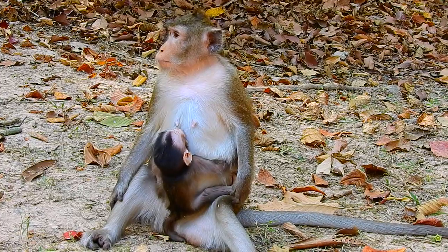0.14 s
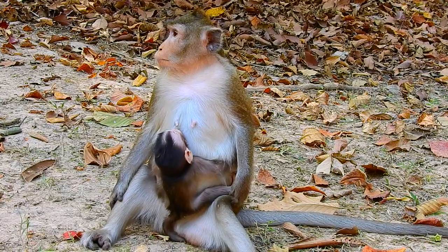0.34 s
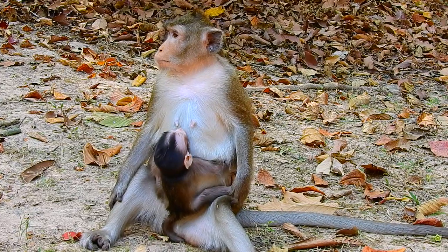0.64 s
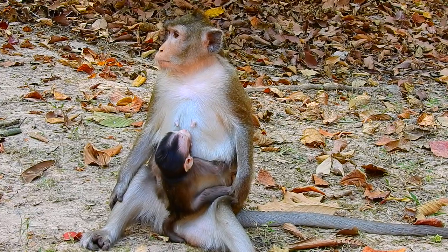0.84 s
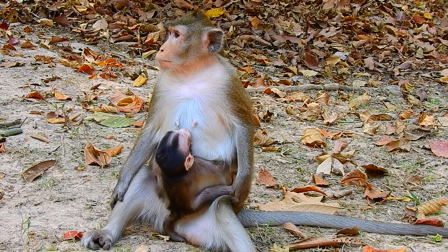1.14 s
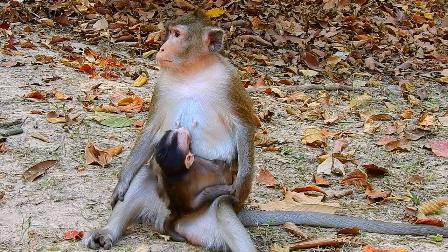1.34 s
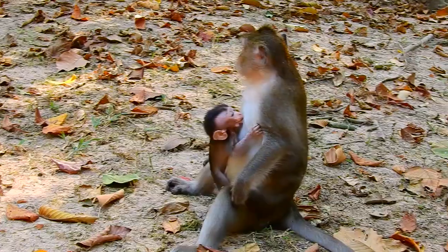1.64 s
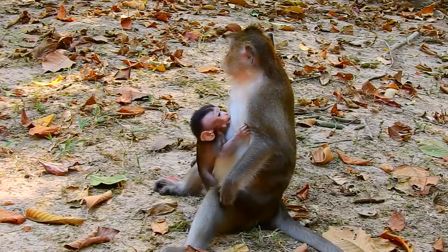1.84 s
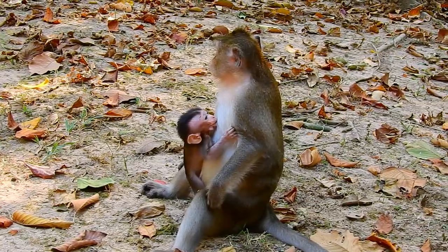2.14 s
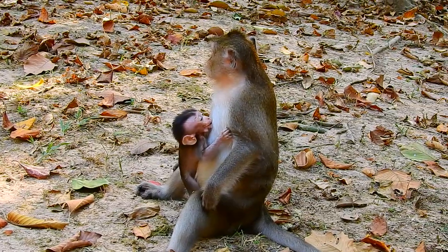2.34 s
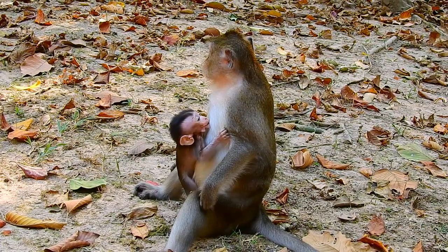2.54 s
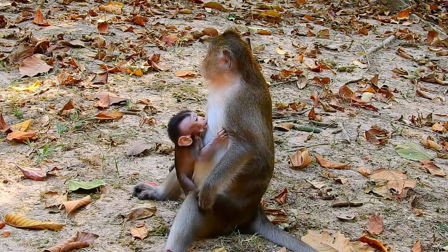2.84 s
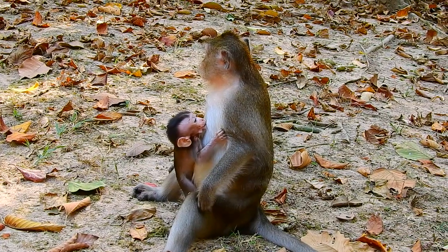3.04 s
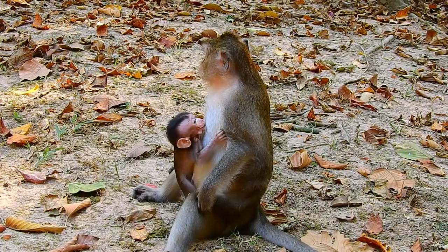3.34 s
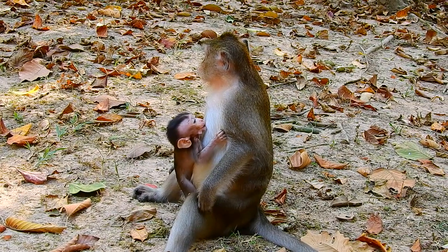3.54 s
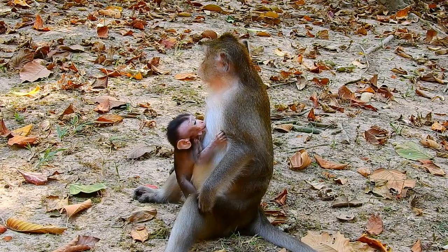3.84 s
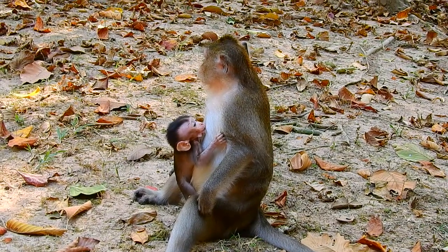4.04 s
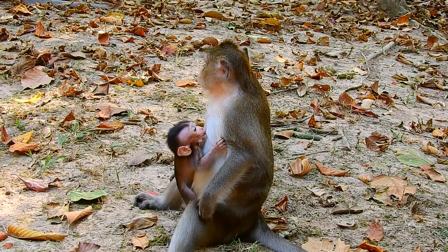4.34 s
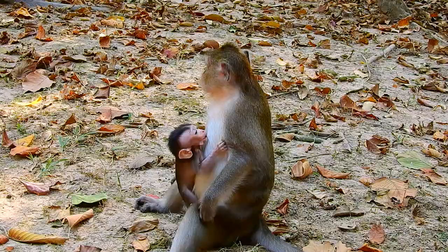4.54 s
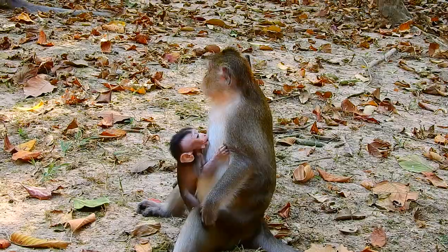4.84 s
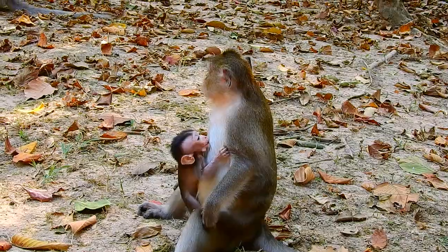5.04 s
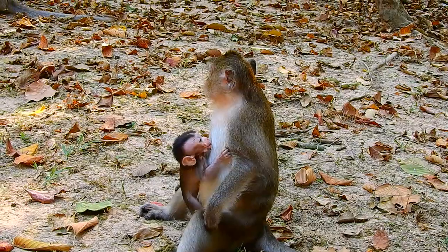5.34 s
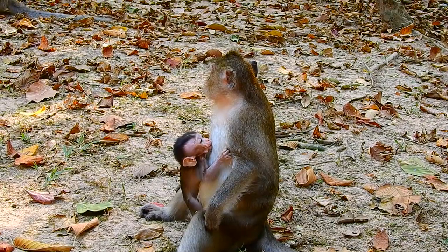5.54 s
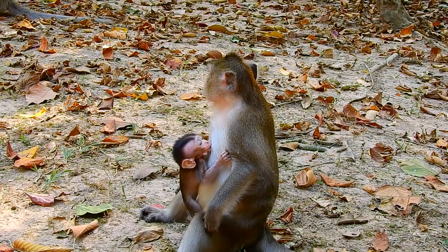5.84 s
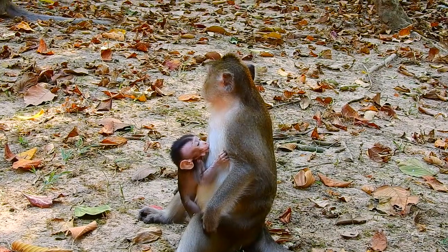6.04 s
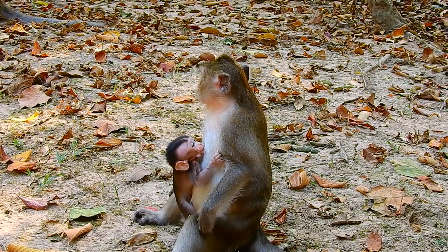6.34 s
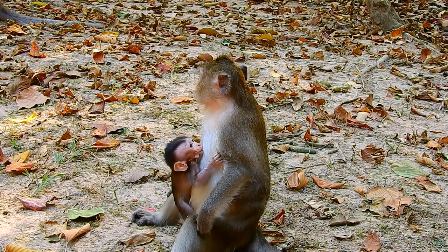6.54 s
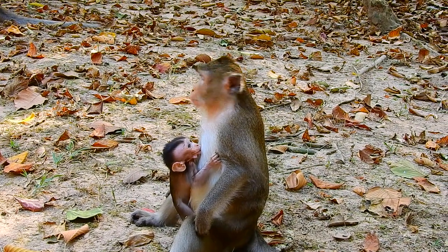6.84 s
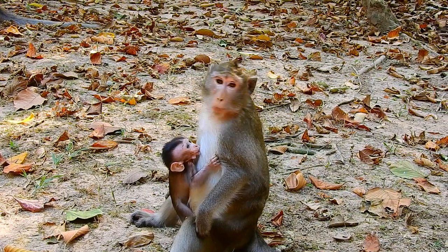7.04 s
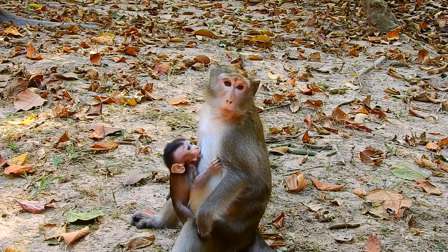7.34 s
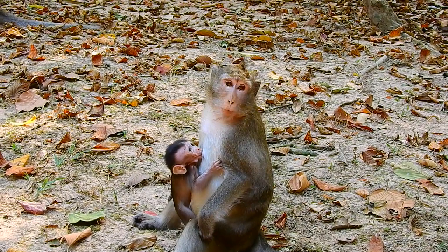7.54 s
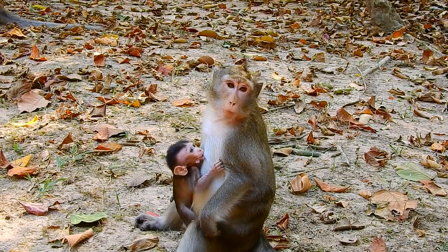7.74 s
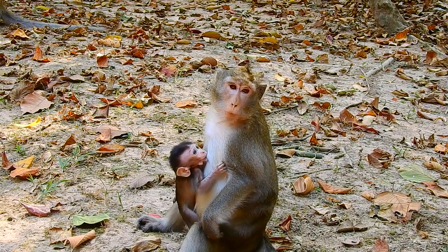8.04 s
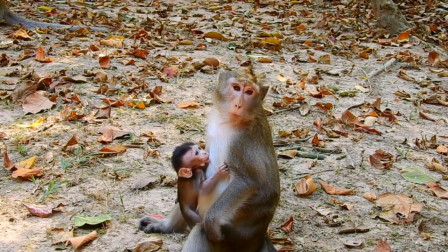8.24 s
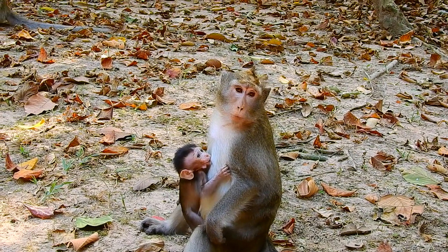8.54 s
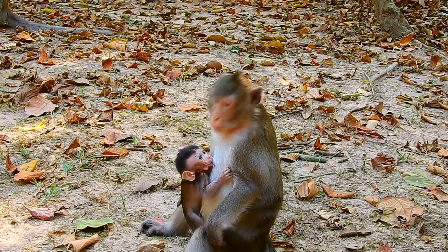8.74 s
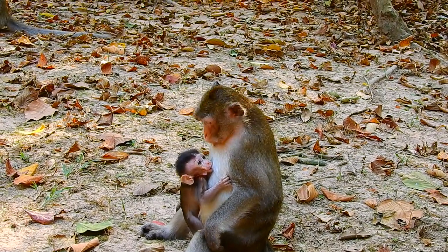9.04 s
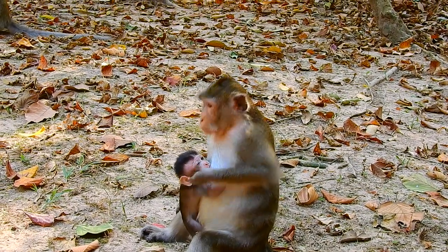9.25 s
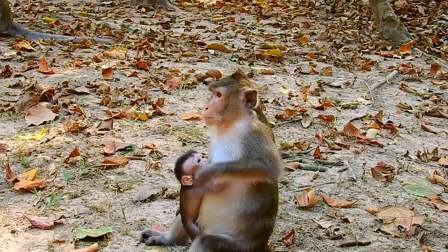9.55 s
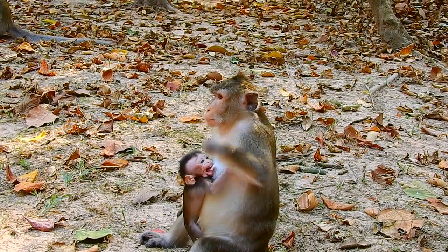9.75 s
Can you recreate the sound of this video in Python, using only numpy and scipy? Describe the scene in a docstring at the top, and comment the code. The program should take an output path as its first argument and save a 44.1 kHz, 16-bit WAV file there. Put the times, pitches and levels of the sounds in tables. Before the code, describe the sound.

In a forest, a young monkey gives two short, high wails that ring among the trees. The sound cuts out for half a second, then faint foliage hiss and far traffic return. A distant bird whistles once, dry leaves crackle lightly, and brief coos come in two groups. At the end, a loud, shrill squeal close to the microphone breaks briefly into a harsh screech.

```python
"""A leaf-strewn forest floor, where young macaques call: two wails ring among the trees, short coos
follow, and a close squeal breaks into a harsh screech. Each call is a vibration of the vocal folds,
filtered by the throat and scattered by trunks and leaves. Behind them are far traffic, the hiss of
foliage and insects, thin squeaks, a bird and rustles in the dry leaves. The sound cuts out for half
a second after the wails."""
import sys
import numpy as np
from scipy import signal
from scipy.fft import rfft, irfft, next_fast_len
from scipy.io import wavfile
from scipy.ndimage import uniform_filter1d, map_coordinates

SR = 44100
rng = np.random.default_rng(int(sys.argv[2]) if len(sys.argv) > 2 else 0)


N = 435688

# noise spectra of far traffic, and of foliage with insects: f/Hz, spectral level/dB
TRAFFIC_SPECTRUM = [(24, -35), (36, -16.5), (50, -3.5), (62, -7.5), (80, -3.5), (105, 1), (145, -0.5),
                    (200, -5.5), (260, -11), (410, -18.5), (600, -21), (850, -27), (1500, -32),
                    (3000, -67.5)]
FOLIAGE_SPECTRUM = [(590, -21.5), (1000, -10.5), (1190, -6), (1290, -2), (1490, -3.5), (1860, -3.5),
                    (2160, -4), (3830, -5.5), (4050, -5.5), (4980, -6), (5920, -3.5), (6410, -2),
                    (9360, -24), (11100, -26.5), (15500, -35.5)]
# coherence of the background between left and right: f/Hz, correlation
ALIKE = [(120, 1), (350, .98), (700, 0.88), (1400, 0.84), (6000, 0.35), (9000, 0.27), (13000, 0.3)]
# reverberation of the forest: f/Hz, reverberation time/s
FOREST = [(300, 0.56), (1500, 0.83), (2600, 1.22), (3100, 1.3), (3500, 0.96), (3850, 1.33), (4300, 1.2),
          (6400, 1.16), (8000, 0.87), (12000, 0.32)]
# wails: t/s, duration/s, top f/Hz, arch slope, final slump/share of pitch, level/dB,
# least roughness (0-1), mouth opening (0-1)
WAILS = [(0, .25, 850, .03, 0.019, -32.5, 0.35, 0.15), (.251, .262, 921, .16, .14, -23, .18, 0.91),
         (1.079, .23, 922, .17, .14, -24.5, .25, 1)]
# formants with the mouth narrow and wide: f/Hz, gain/dB
NARROW_MOUTH = [(500, -34.5), (830, -19), (1700, -14.5), (2520, -2.5), (3400, -3), (4200, -22.5), (5020, 1),
                (5850, -18), (6750, -8), (7600, -13), (8500, -23.5), (10000, -51)]
WIDE_MOUTH = [(500, -42), (870, -24), (1750, -14), (2650, -7), (3100, -10), (3450, 1), (3780, 5),
              (4150, -14), (5400, -9), (5800, -11), (6200, -2), (7300, -13), (7900, -12), (9000, -25),
              (13000, -46)]
# bumps, swishes and faint ringing: peak t/s, centre f/Hz, spread/octaves, rise time/s, level/dB
BUMPS = [(.866, 1250, .55, .0071, -33), (.881, 7200, .31, 0.014, -48), (1.028, 815, 0.4, 0.0039, -35.5),
         (2.08, 6400, 0.21, 0.066, -52), (3.294, 6200, .1, .026, -46), (3.668, 4300, .14, 0.12, -54),
         (4.144, 551, .05, 0.66, -51.5), (4.675, 1580, .8, .015, -45), (5.83, 6200, .2, .03, -49),
         (6.336, 353, 0.076, 0.032, -37), (6.4, 6500, 0.11, .35, -53.5), (7.03, 2200, .12, .11, -52),
         (7.16, 1800, .3, .07, -52), (7.848, 1150, .14, .0043, -35.5), (8.456, 252, 0.26, .026, -29),
         (8.497, 179, 0.44, .03, -25.5), (8.88, 4100, .12, 0.13, -52)]
# the loudest leaf crackles: t/s, relative level/dB, relative crunch/dB
CRACKLES = [(4.5314, -32.5, -14.5), (4.8194, -29.5, -10), (4.8998, -28.5, -10), (5.8062, -31.5, -7),
            (6.1674, -29.5, -18), (6.2994, -33.5, -7.5), (6.9097, -29.5, -3), (8.5989, -28.5, -19)]
# fainter crackles at random: start t/s, end t/s, relative level/dB, relative crunch/dB
LEAF_STIR = (3.5, 8.5, -38, -10)
# a crackle's crisp edge and the duller crunch beneath: f/Hz, level/dB
EDGE_SPECTRUM = [(1000, -14), (2500, -3), (4500, -2), (6500, 4), (8500, -16), (14000, -37)]
CRUNCH_SPECTRUM = [(400, -12), (1000, 2), (2500, -1), (4500, -12), (8000, -30)]
# squeaks: t/s, duration/s, top f/Hz, arch depth, place of the top (0-1), level/dB
SQUEAKS = [(2.56, .29, 11500, .11, .2, -71), (4.68, 0.11, 11400, .06, .45, -71),
           (6.96, .18, 13300, .27, .27, -70), (8.9, .35, 13200, .24, .45, -73)]
# the bird's whistle: t/s, duration/s, level/dB
BIRD_NOTE = (3.315, .25, -42.5)
# its reflections from far trees: delay/s, gain/dB
BIRD_ECHOES = [(.3, -14), (.52, -19)]
# coos: t/s, duration/s, top f/Hz, arch depth, place of the top (0-1), level/dB, overtone gain/dB
COOS = [(4.302, 0.056, 1212, 0.2, 0.4, -27, -6), (4.454, 0.067, 1365, .14, 0.34, -27, -1),
        (7.3, 0.065, 1290, 0.17, 0.33, -28.5, 1.5), (7.465, 0.059, 1200, 0.16, 0.33, -35, 4.5),
        (7.613, .058, 1282, 0.132, .34, -34, 3.5), (7.809, 0.056, 1528, .045, 0.6, -35.5, 14)]
# formants of the cooing throat: f/Hz, gain/dB
COO_THROAT = [(2000, -23), (2500, -15), (3300, -30), (4500, -17.5), (5300, -21), (6200, -14.5), (7600, -32),
              (9000, -41), (11000, -47), (14000, -58)]
# the squeal's three pushes, a list for each: t/s, f/Hz, level/dB
SQUEAL_PUSHES = [
    [(9.546, 7857, -30), (9.552, 7988, -20), (9.562, 7855, -20), (9.57, 8047, -11.5), (9.586, 8459, -13.5),
     (9.6, 9069, -21.5), (9.624, 9100, -24), (9.637, 9093, -22)],
    [(9.64, 9094, -15.5), (9.654, 9268, -15), (9.692, 9133, -24), (9.706, 8929, -24)],
    [(9.752, 9080, -23.5), (9.764, 9951, -20.5), (9.772, 10160, -24), (9.816, 8882, -24.5),
     (9.842, 8945, -29), (9.856, 8580, -25), (9.866, 9055, -31.5), (9.879, 9647, -28)],
]
# its hoarse edge: f/Hz, level/dB
RASP_SPECTRUM = [(2500, -31), (4000, -10), (4600, 2.5), (5300, -4), (6500, -2), (8000, -6.5),
                 (10500, -17.5), (13000, -26), (15500, -44)]
# its subharmonic stretch: start t/s, end t/s, level before the swell/dB
SPLIT = (9.677, 9.724, -15)
# the partials added there: f/quarters of the pitch, relative level/dB
SPLIT_PARTIALS = [(2, -18), (3, -1.5), (5, -27)]
# the break into a screech: start t/s, end t/s, level/dB
SCREECH = (9.708, 9.75, -13.5)
# irregular motion of the vocal folds: f/Hz, level/dB
FOLD_SPECTRUM = [(3000, -31.5), (4500, 4.5), (7500, -3.5), (10000, -16.5)]
# formants of the screeching throat: f/Hz, gain/dB
SCREECH_THROAT = [(2200, -40), (2900, -10), (3600, -21.5), (4500, -12.5), (6200, 1), (6900, 4.5),
                  (7900, -12.5), (8800, -7), (10500, -7), (12000, -14), (15000, -25), (16000, -46.5)]
# the silent gap: start t/s, end t/s
PAUSE = (1.042, 1.538)


def write(x):
    x = np.atleast_2d(x).T
    wavfile.write(sys.argv[1], SR, np.round(np.clip(x, -1, 1) * 32767).astype(np.int16))


def amp(db):
    """Decibels to gain."""
    return 10 ** (np.asarray(db) / 20)


def unit(x):
    """Scale to rms 1."""
    return x / np.sqrt(np.mean(x ** 2) + 1e-20)


def along(points, hz):
    """(Hz, value) points read on a log axis."""
    f, v = np.transpose(points)
    return np.interp(np.log(np.abs(hz) + 1), np.log(f + 1), v)


def clock():
    """The time of each sample."""
    return np.arange(N) / SR


def curves(rows):
    """One value per sample for each column after the time."""
    s, *cols = np.transpose(rows)
    return [np.interp(clock(), s, c) for c in cols]


def during(start, end, fade=.003):
    """1 between two times, with short fades outside."""
    t = clock()
    return np.clip(1 + np.minimum(t - start, end - t) / fade, 0, 1)


def wobble(rate, size=N):
    """A smooth random curve, rate knots a second."""
    return map_coordinates(rng.standard_normal(int(size * rate / SR) + 4), [np.arange(size) * rate / SR])


def filtered(x, response):
    """x times a response of frequency."""
    m = next_fast_len(N + 8192)
    return irfft(rfft(x, m) * response(np.fft.rfftfreq(m, 1 / SR)), m)[..., :N]


def noise(spectrum):
    """Coloured noise of rms 1."""
    return unit(filtered(rng.standard_normal(N), lambda hz: amp(along(spectrum, hz))))


def turns(hz):
    """The running phase of a pitch curve."""
    return 2 * np.pi * np.cumsum(hz) / SR


def whistle(hz, jitter, jitter_rate):
    """A pure, slightly unsteady tone of rms 1."""
    return np.sqrt(2) * np.sin(turns(hz * (1 + jitter * wobble(jitter_rate))))


def rush(spectrum, patchy_db):
    """Partly coherent stereo noise of rms 1, with patches of random gain in time and frequency."""
    z = signal.stft(rng.standard_normal((2, N)), nperseg=512)[2]
    field = uniform_filter1d(rng.standard_normal(z.shape[1:]), size=10, axis=0)
    field = uniform_filter1d(field, size=16, axis=1)
    pair = signal.istft(z * amp(patchy_db * unit(field)), nperseg=512)[1][:, :N]
    angle = lambda hz: np.arccos(np.clip(along(ALIKE, hz), -1, 1)) / 2
    shares = lambda hz: np.array([np.cos(angle(hz)), np.sin(angle(hz))])
    mid, side = filtered(pair, lambda hz: amp(along(spectrum, hz)) * shares(hz))
    return unit(np.array([mid + side, mid - side]))


def among_trees(x, wet_db, side_db):
    """Reverberation: scatter from trunks and leaves follows the direct sound and decays exponentially."""
    hz, t, z = signal.stft(rng.standard_normal((2, 2 * SR)), SR, nperseg=256)
    tail = signal.istft(z * amp(-60 * t / along(FOREST, hz)[:, None]), SR, nperseg=256)[1]
    mid, side = signal.fftconvolve(x[None], tail / np.linalg.norm(tail[0]), axes=1)[:, :N]
    side = side * amp(side_db)
    return x + amp(wet_db) * np.array([mid + side, mid - side])


def ramp(age, attack_s):
    """0 before an onset, rising straight to 1."""
    return np.clip(age / attack_s, 0, 1)


def arch(progress, depth, crest):
    """Frequency ratio along a hyperbolic arch, 1 at the crest."""
    return 1 - depth * (np.hypot(progress - crest, .3) - .3) * 2.4


def delayed(x, seconds):
    """A delay is a phase lag proportional to frequency."""
    return filtered(x, lambda hz: np.exp(-2j * np.pi * hz * seconds))


def traffic(db=-38, rise_db_per_s=.68):
    """Low-frequency noise from far traffic gains level as its source draws slowly nearer."""
    return amp(db + rise_db_per_s * clock() + .2 * wobble(12)) * rush(TRAFFIC_SPECTRUM, patchy_db=1.1)


def foliage(db=-48, rise_db_per_s=.19):
    """Many incoherent sources, leaves and insects, sum to a broadband hiss."""
    return amp(db + rise_db_per_s * clock() + .4 * wobble(11)) * rush(FOLIAGE_SPECTRUM, patchy_db=1.0)


def wail_controls(crest=.63, scoop_s=.025, slump_s=.016, attack_s=.025, release_s=.012):
    """Vocal effort couples pitch, level and roughness: a wail is loudest and cleanest at its top."""
    t, controls = clock(), np.zeros((4, N))
    for start, length, top_hz, slope, slump, db, rough, opening in WAILS:
        age = np.clip(t - start, 0, length)
        scoop = .14 * np.exp(-age / scoop_s)
        # share by which the pitch lies below the top
        slack = scoop + slope * np.abs(age / length - crest) + slump * np.exp((age - length) / slump_s)
        gain = amp(db - 16 * slack) * np.sqrt(ramp(age, attack_s) * ramp(length - age, release_s))
        wail = [top_hz * (1 - slack), gain, rough + 1.7 * slack, opening * ramp(age, attack_s=.04)]
        controls = np.where(t >= start, wail, controls)
    return controls


def wails():
    """Source and filter: the opening mouth shapes a harmonic series; strain adds jitter and rasp."""
    hz, gain, rough, opening = wail_controls()
    mouth_db = lambda f: (1 - opening) * along(NARROW_MOUTH, f) + opening * along(WIDE_MOUTH, f)
    jitter = .009 * wobble(40) + rough * (.034 * wobble(200) + .03 * wobble(1100))
    phase = turns(hz * (1 + jitter))
    # paths off the ground make each harmonic flutter on its own
    voice = sum(amp(mouth_db(k * hz) + 2.6 * wobble(45)) * np.sin(k * phase) for k in range(1, 14))
    breath = (1 - opening) * noise(NARROW_MOUTH) + opening * noise(WIDE_MOUTH)
    rasp = breath * (1 + np.cos(phase))
    cry = gain * (.73 * voice * amp(2.2 * wobble(170)) + .53 * rough * rasp)
    return among_trees(cry, wet_db=-7, side_db=-5.5)


def bumps():
    """Band-limited noise swells and decays: short, broad bands bump, and long, narrow ones ring."""
    t, out = clock(), np.zeros(N)
    for peak_s, centre_hz, octaves, rise_s, db in BUMPS:
        passband = lambda hz: np.exp(-.5 * (np.log2((hz + 1) / centre_hz) / octaves) ** 2)
        band = unit(filtered(rng.standard_normal(N), passband))
        age = np.maximum((t - peak_s) / rise_s + 1, 0)
        out += amp(db) * band * age ** 2 * np.exp(2 - 2 * age)
    return out


def rustles():
    """Scattering from the trees gives the bumps and crackles a faint reverberant tail."""
    return among_trees(bumps() + crackles(), wet_db=-16.5, side_db=-8)


def squeaks():
    """Frequency modulation bends a thin, high tone into arched squeaks, heard as direct sound only."""
    t, hz, gain = clock(), np.zeros(N), np.zeros(N)
    for start, length, top_hz, depth, crest, db in SQUEAKS:
        hz = np.where(t >= start, top_hz * arch(ramp(t - start, length), depth, crest), hz)
        gain += amp(db) * during(start, start + length)
    return gain * whistle(hz, jitter=.012, jitter_rate=60) * amp(2.5 * wobble(40))


def bird(from_hz=2890, to_hz=2180, fall_s=.042, attack_s=.051, fade_db_per_s=47):
    """A far whistle falls and settles on one note; at this range reflections outweigh direct sound."""
    start, length, db = BIRD_NOTE
    age = np.maximum(clock() - start, 0)
    hz = to_hz + (from_hz - to_hz) * np.exp(-(age / fall_s) ** 2)
    gain = amp(db - fade_db_per_s * (age - attack_s)) * ramp(age, attack_s)
    call = gain * during(start, start + length) * whistle(hz, jitter=.0056, jitter_rate=150)
    echoes = sum(amp(echo_db) * delayed(call, delay_s) for delay_s, echo_db in BIRD_ECHOES)
    return among_trees(call + echoes, wet_db=1, side_db=-7)


def crackles(faint_count=7, attack_s=.0013, t60_s=.14):
    """Brittle fracture: dry leaves break in quick uneven snaps, in bursts that decay exponentially."""
    t, edge, crunch = clock(), np.zeros(N), np.zeros(N)
    first, last, stir_db, stir_crunch_db = LEAF_STIR
    faint = [(first + (last - first) * when, stir_db + 5 * (size - .5), stir_crunch_db)
             for when, size in rng.random((faint_count, 2))]
    for start, db, crunch_db in CRACKLES + faint:
        age = np.maximum(t - start + .002, 0)
        burst = amp(db - 11.5 - 60 * age / t60_s) * (1 - np.exp(-age / attack_s))
        edge += burst
        crunch += burst * amp(crunch_db - .5)
    leaves = edge * noise(EDGE_SPECTRUM) + crunch * noise(CRUNCH_SPECTRUM)
    snaps = unit(amp(3 * wobble(900)))
    return leaves * snaps


def coos():
    """Throat resonances weight the harmonics of short arched notes; higher harmonics bloom later."""
    out = np.zeros(N)
    for start, length, top_hz, depth, crest, db, overtone_db in COOS:
        size = int(length * SR)
        progress = np.linspace(0, 1, size)
        hz = top_hz * arch(progress, depth, crest)
        phase = turns(hz * (1 + .01 * wobble(900, size)))
        note = np.sin(phase)
        for k in range(2, 10):
            bloom_db = 5.1 * (progress - .8) * np.log2(k)
            throat_db = along(COO_THROAT, k * hz) + 2.9 * wobble(99, size)
            note += amp(overtone_db + throat_db + bloom_db) * np.sin(k * phase)
        swell = np.abs(np.sin(np.pi * progress ** .77)) ** .81
        out[round(start * SR):][:size] += np.sqrt(2) * amp(db) * swell * note
    return among_trees(out, wet_db=-31.5, side_db=1)


def insect(start_s=4.7, climb_s=4.9, from_hz=4790, to_hz=6140, db=-59.5):
    """Rapid frequency jitter broadens one insect's slowly climbing tone into a buzz."""
    age = clock() - start_s
    climb = np.sin(np.pi / 2 * ramp(age, climb_s)) ** 2
    buzz = whistle(from_hz + (to_hz - from_hz) * climb, jitter=.024, jitter_rate=900)
    return amp(db) * ramp(age, attack_s=.3) * buzz


def squeal(break_sag=.07, break_loss_db=7.5, ground_delay_s=.0011, ground_db=-10):
    """Nonlinear vocal fold vibration: a high, hoarse tone splits, breaks into a screech and recovers."""
    t, course = clock(), np.vstack(SQUEAL_PUSHES)
    start, end, mean_db = course[0, 0], course[-1, 0], course[:, 2].mean()
    hz, db = curves(course)
    break_start, break_end, _ = SCREECH
    broken = np.sin(np.pi * ramp(t - break_start, break_end - break_start))
    phase = turns(hz * (1 - break_sag * broken) * (1 + .005 * wobble(600)))
    tone = np.sqrt(2) * amp(db - break_loss_db * broken + 1.1 * wobble(300)) * np.sin(phase)
    rasp_db = -42 - .5 * (db - mean_db) + 2.5 * wobble(500)  # hoarseness yields as the tone grows
    rasp = amp(rasp_db) * ramp(t - start, attack_s=.058) * noise(RASP_SPECTRUM)
    voice = (tone + rasp + subharmonics(phase) + screech()) * during(start, end)
    # the ground reflection is in antiphase between left and right
    bounce = amp(ground_db) * delayed(voice, ground_delay_s)
    return among_trees(voice, wet_db=-19.5, side_db=1.5) + np.array([bounce, -bounce])


def subharmonics(phase, swell_db=5, attack_s=.0052, release_s=.004):
    """Period quadrupling adds partials at multiples of a quarter of the squeal's pitch."""
    t = clock()
    start, end, db = SPLIT
    partials = sum(amp(level) * np.sin(quarters * phase / 4) for quarters, level in SPLIT_PARTIALS)
    swell = np.sin(np.pi * ramp(t - start, end - start))
    gate = ramp(t - start, attack_s) * ramp(end - t, release_s)
    return np.sqrt(2) * amp(db + swell_db * swell + 1.3 * wobble(350)) * gate * partials


def screech():
    """Aperiodic excitation: the folds slap with uneven but bounded force, and the throat resonates."""
    start, end, db = SCREECH
    slaps = np.tanh(noise(FOLD_SPECTRUM)) * (1 + .61 * np.tanh(2 * wobble(1300)))
    ringing = unit(filtered(slaps, lambda hz: amp(along(SCREECH_THROAT, hz))))
    return amp(db) * during(start, end) * ringing


def scene():
    """Superposition: the calls and rustles add to the forest background."""
    calls = wails() + coos() + squeal() + squeaks() + bird()
    return calls + rustles() + traffic() + foliage() + insect()


def record(dry):
    """A gate silences the pause, soft saturation rounds the peaks, and a low-pass limits the band."""
    gated = dry * (1 - during(*PAUSE, fade=.001))  # of the third wail, only the reverberation is heard
    rounded = gated / (1 + np.abs(gated / .85) ** 8) ** (1 / 8)
    return filtered(rounded, lambda hz: hz < 15700)


dry = scene()
out = record(dry)
write(out)
```